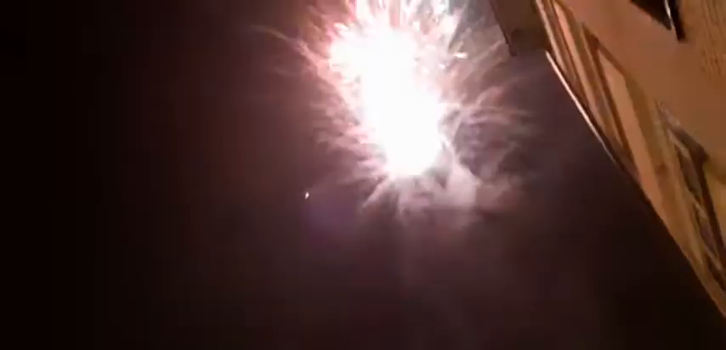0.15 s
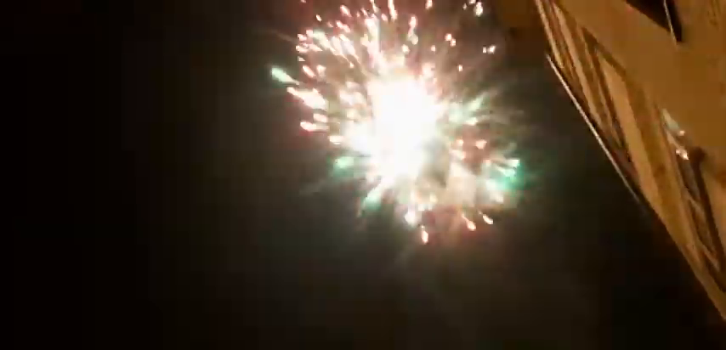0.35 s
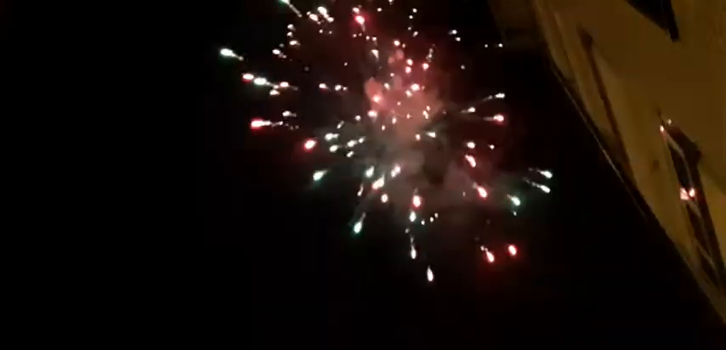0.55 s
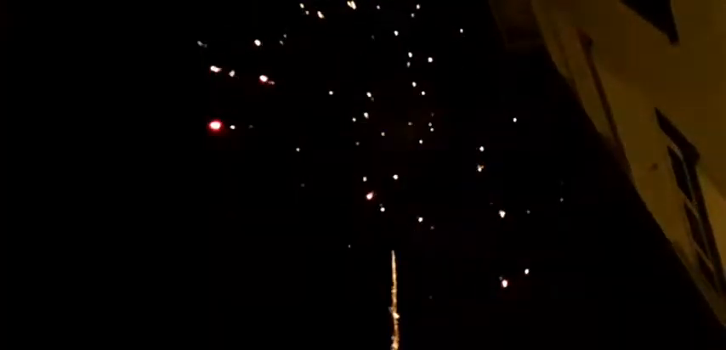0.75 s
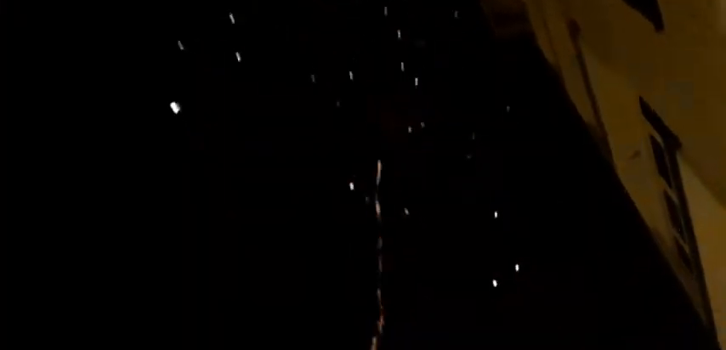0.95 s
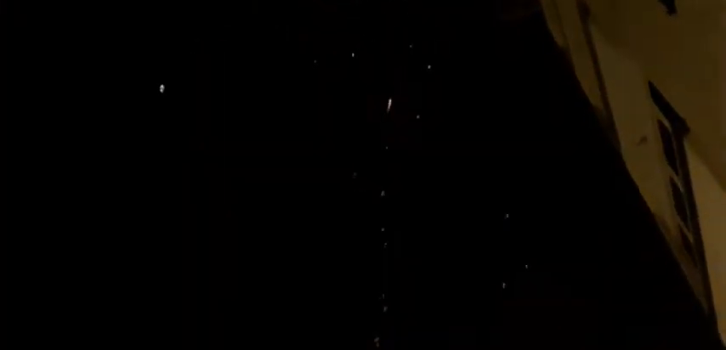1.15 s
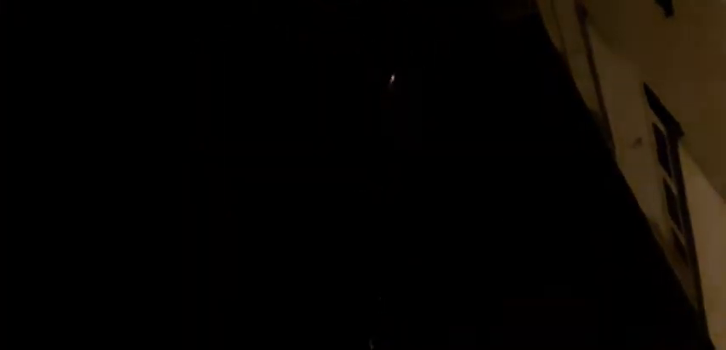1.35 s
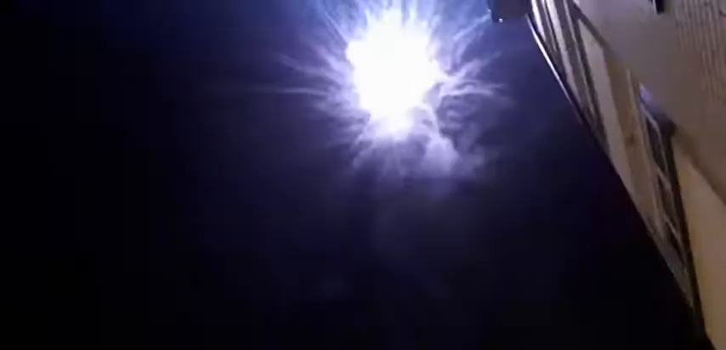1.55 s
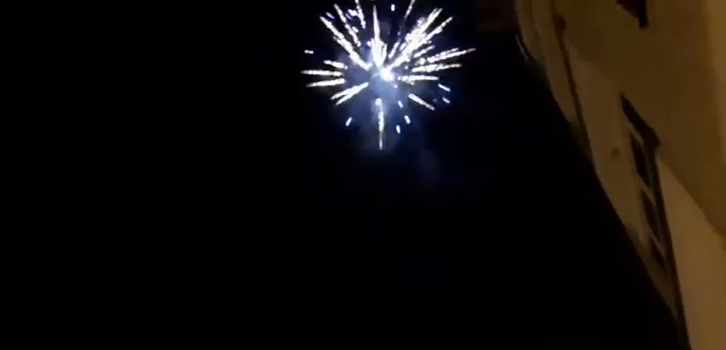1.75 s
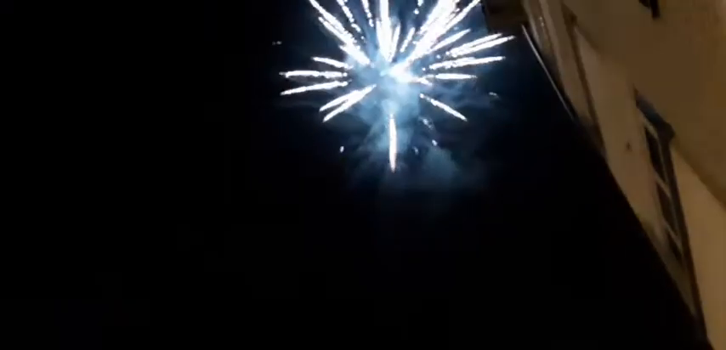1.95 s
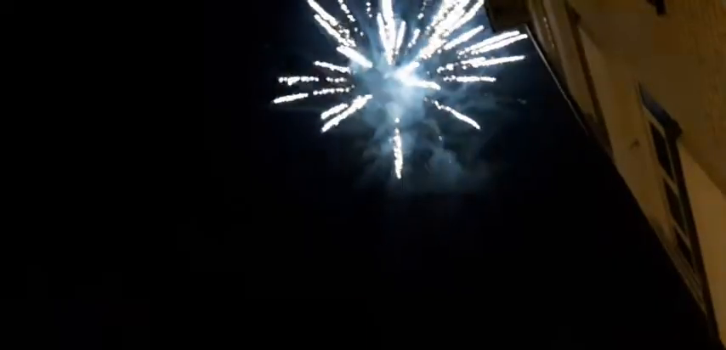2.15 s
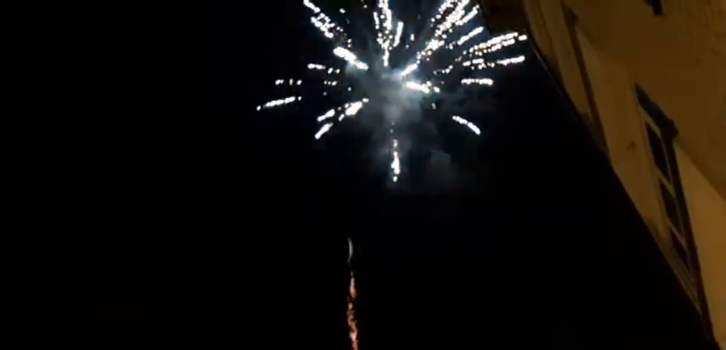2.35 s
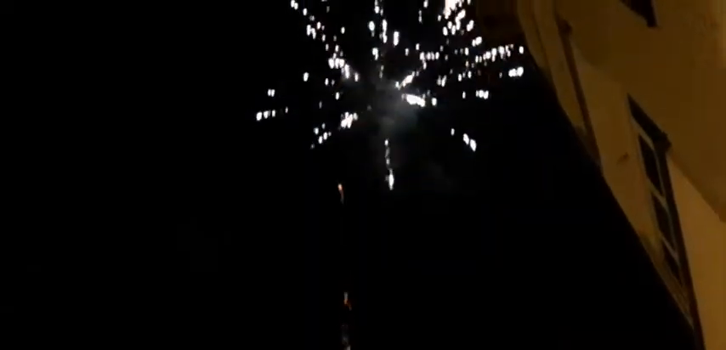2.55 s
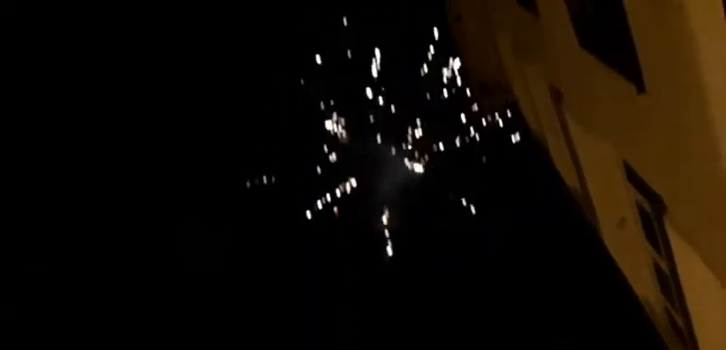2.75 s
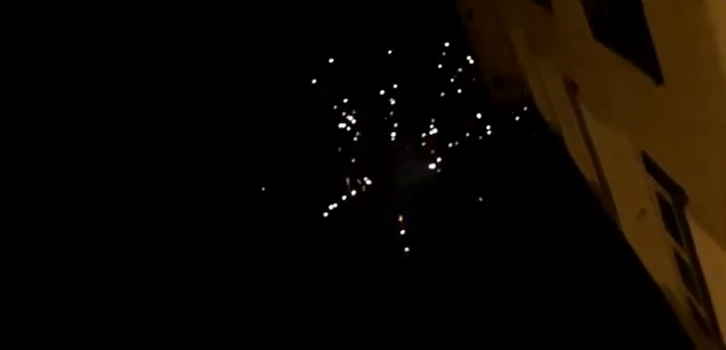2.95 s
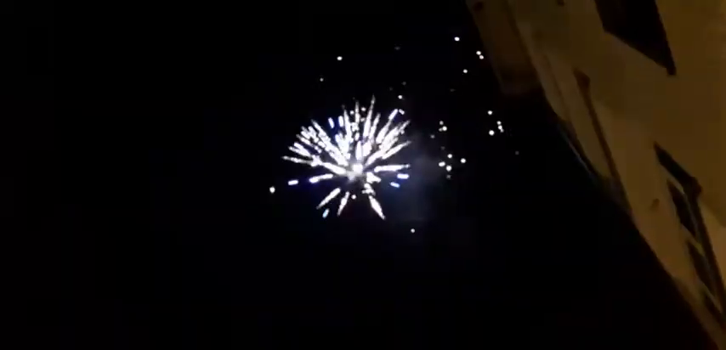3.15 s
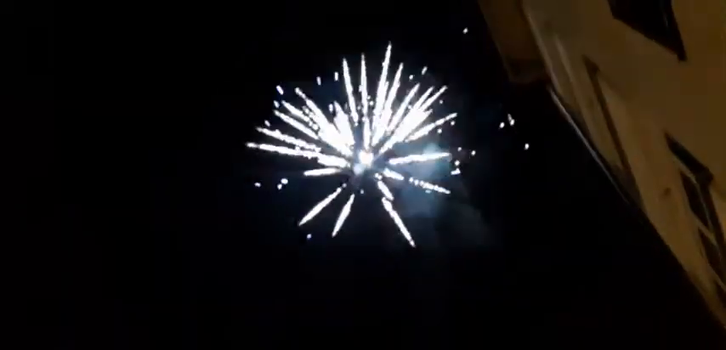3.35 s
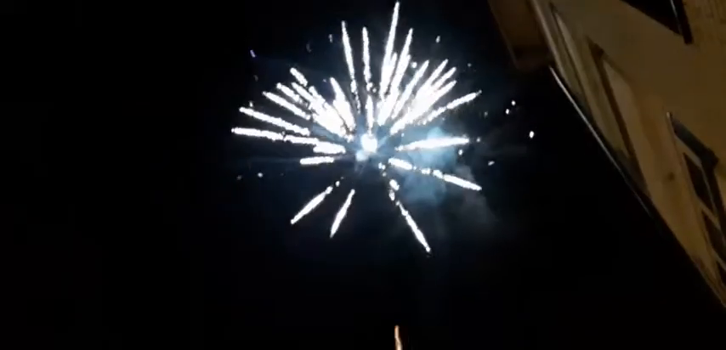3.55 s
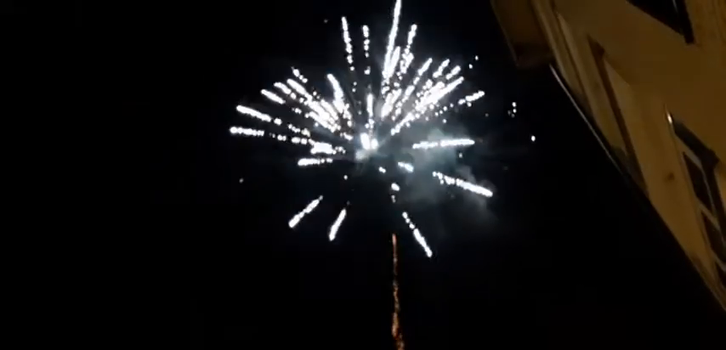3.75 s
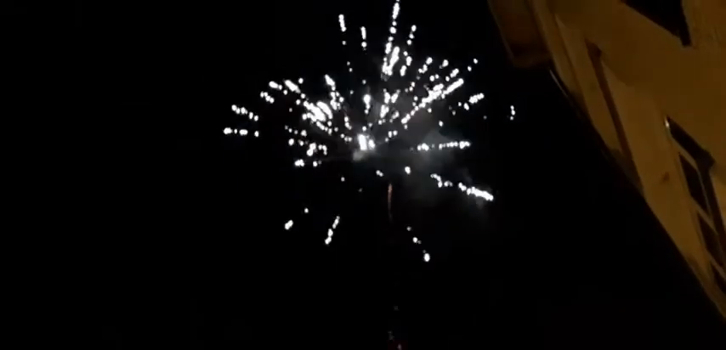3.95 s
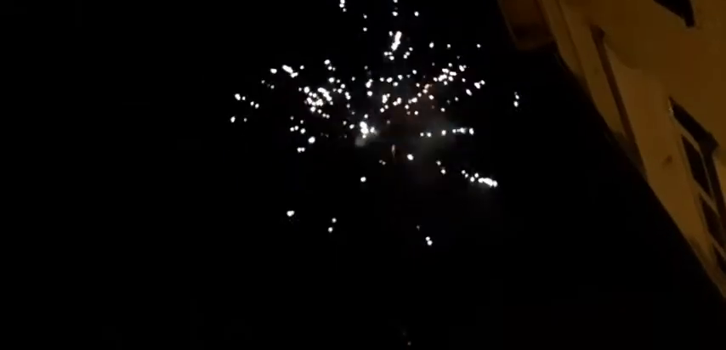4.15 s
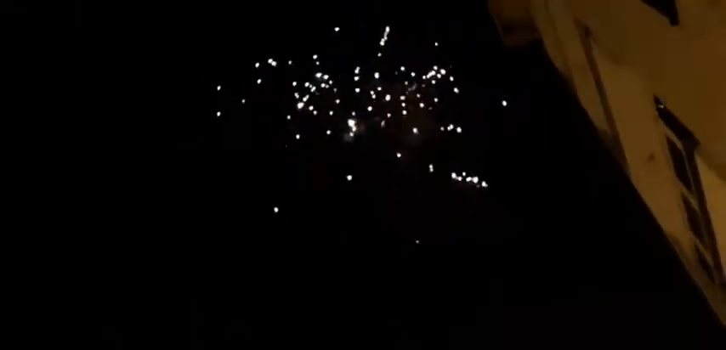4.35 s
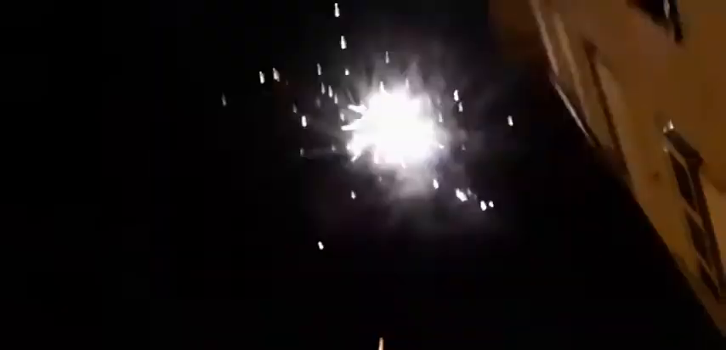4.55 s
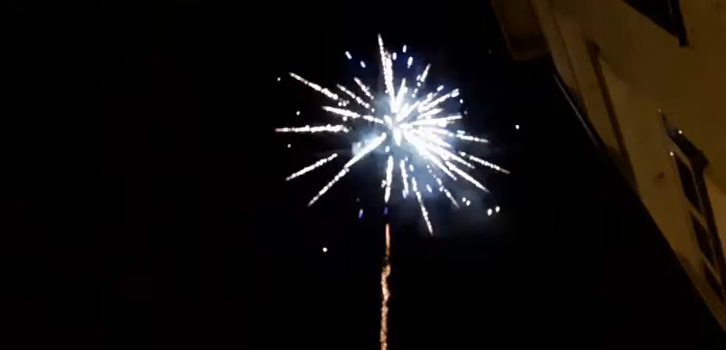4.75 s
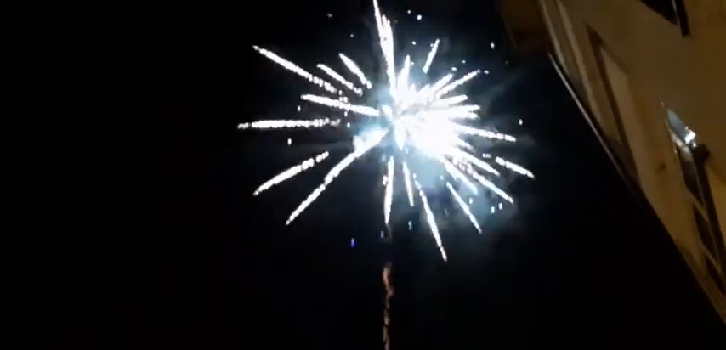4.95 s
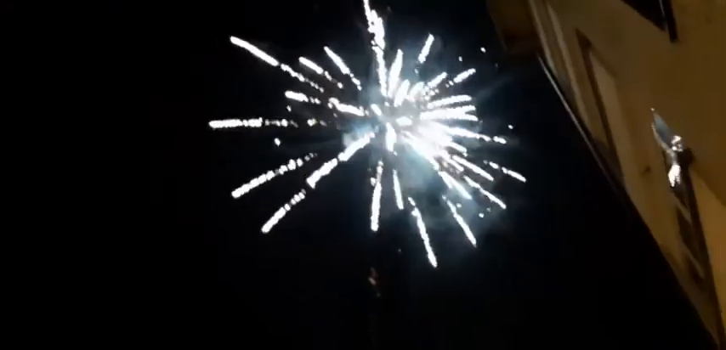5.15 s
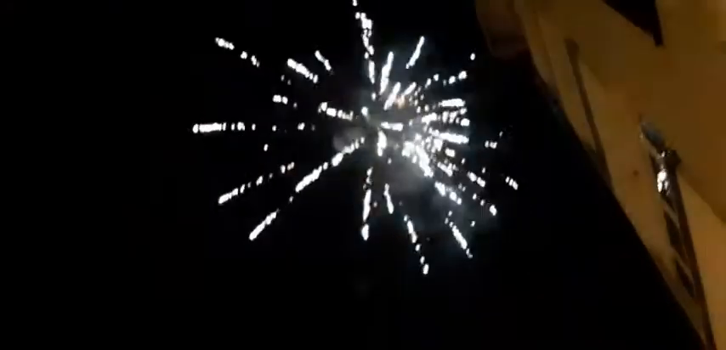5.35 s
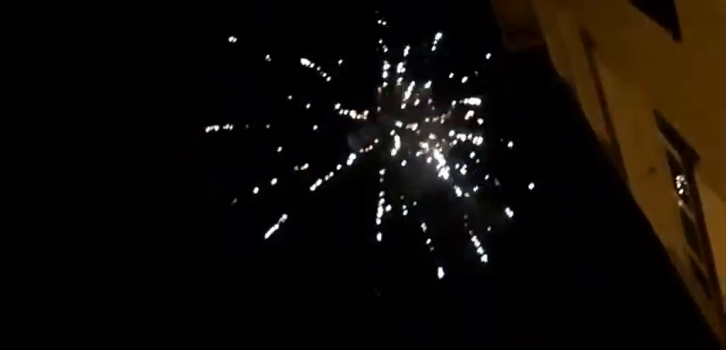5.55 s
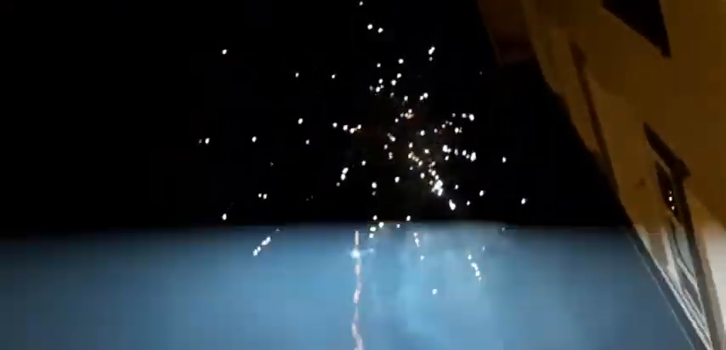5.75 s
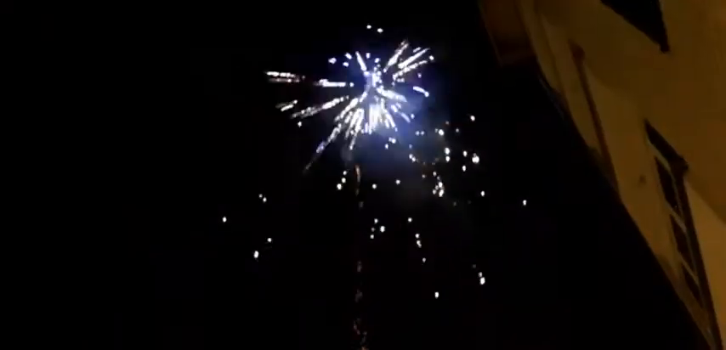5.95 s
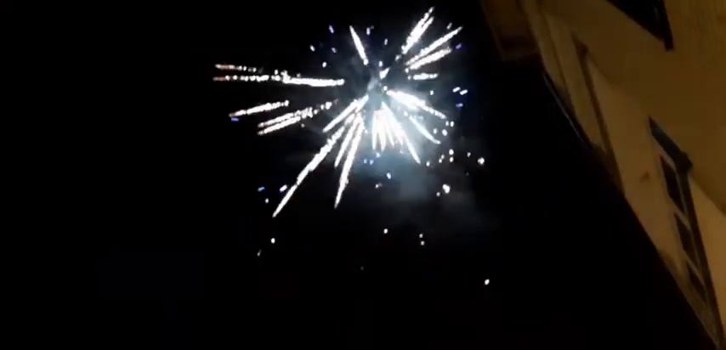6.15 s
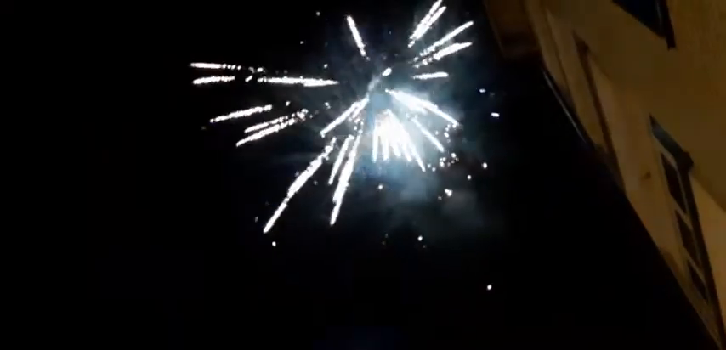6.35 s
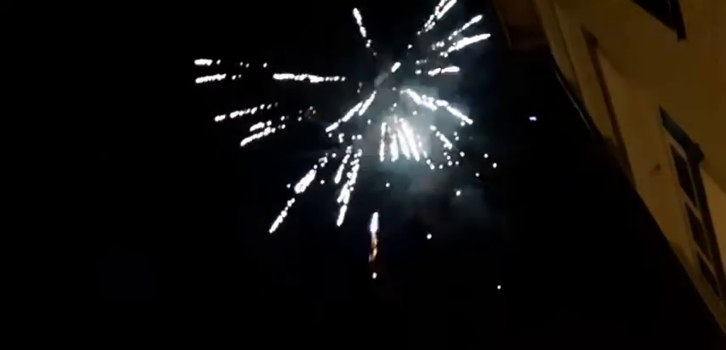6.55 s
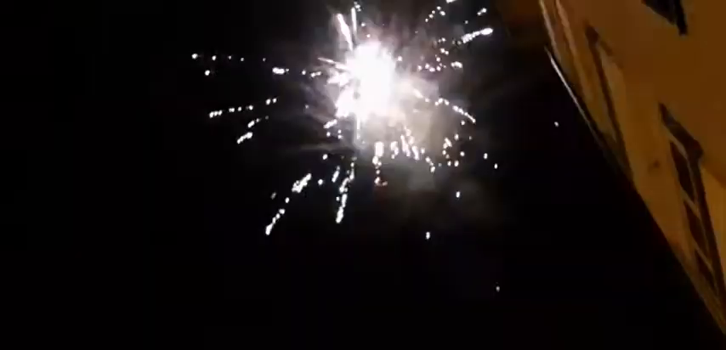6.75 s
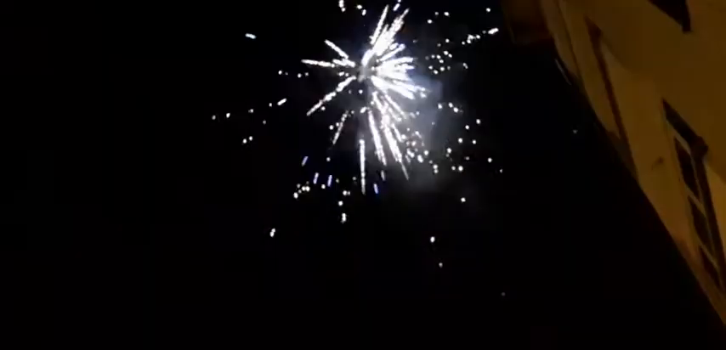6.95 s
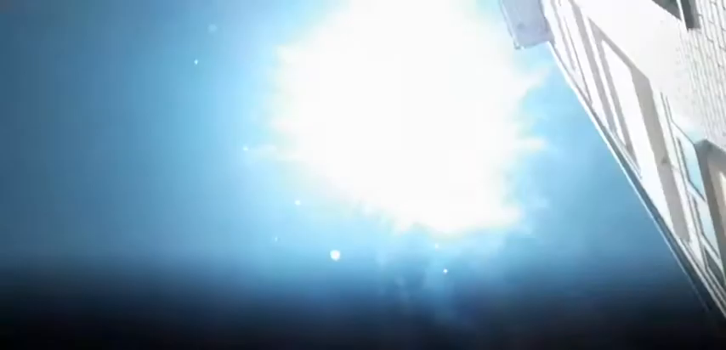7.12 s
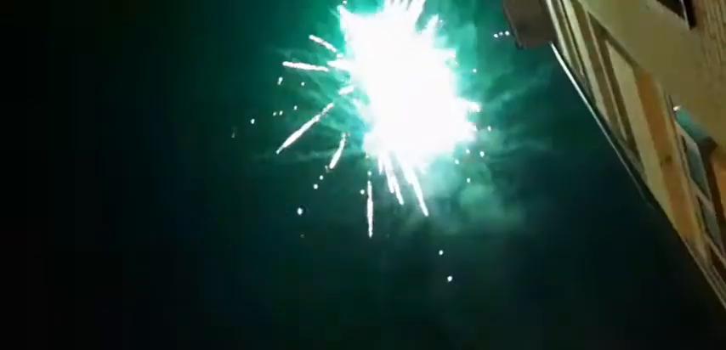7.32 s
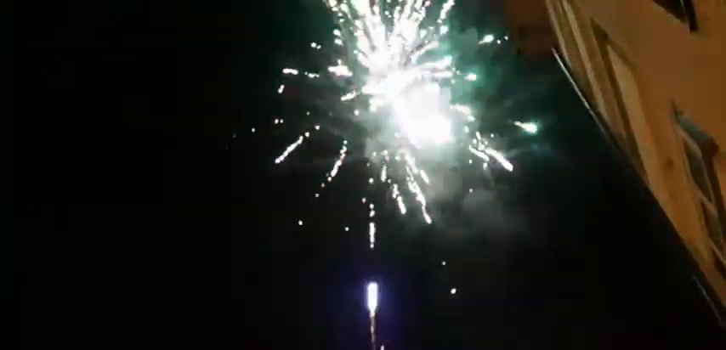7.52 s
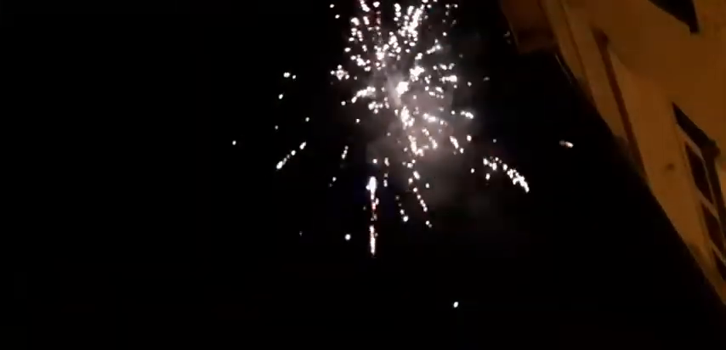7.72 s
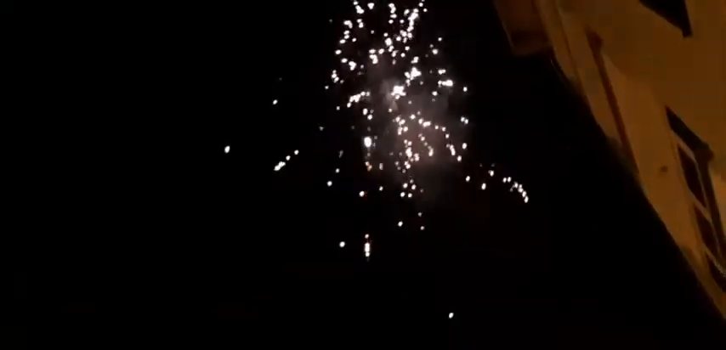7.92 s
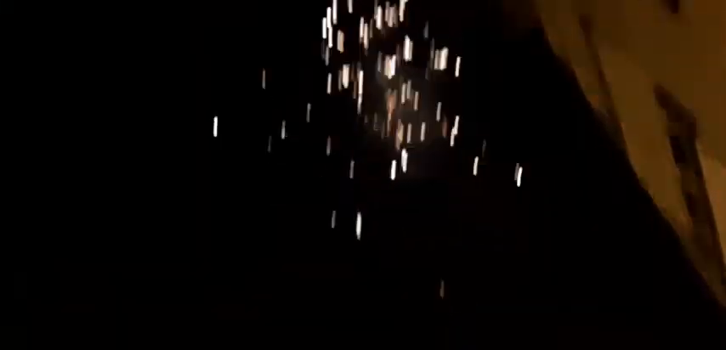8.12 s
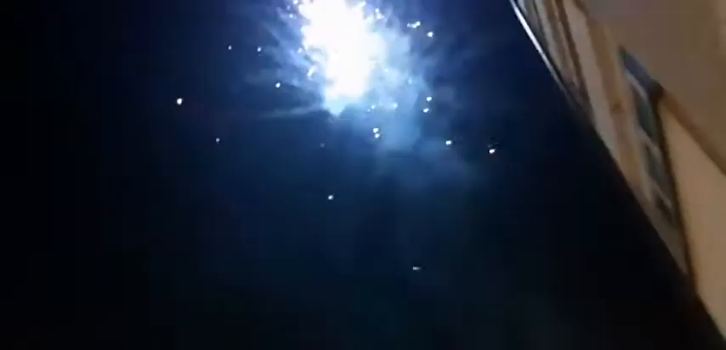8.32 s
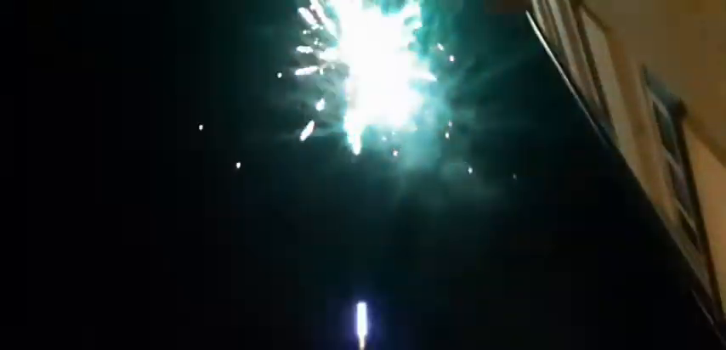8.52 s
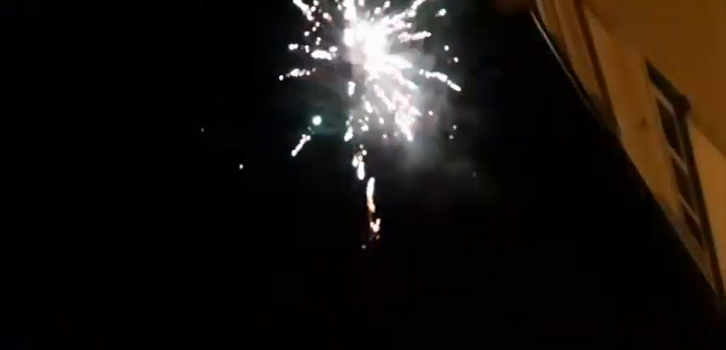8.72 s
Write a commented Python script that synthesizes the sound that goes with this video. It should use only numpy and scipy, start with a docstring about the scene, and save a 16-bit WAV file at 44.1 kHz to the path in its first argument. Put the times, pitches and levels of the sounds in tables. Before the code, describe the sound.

A firework battery fires close by in a narrow street at night. Punchy launch thumps from the ground and sharp, hollow bangs overhead come in an irregular series, often in pairs, with smaller pops and brief, light crackling between them. Each bang slaps off the house fronts and rolls away over the roofs. The stereo microphone stands near a wall and overloads slightly on the loudest hits.

```python
"""Fireworks in a narrow street

Night, a stereo pair close under a house front, a firework battery firing nearby. Mortars thump on the ground,
shells burst overhead, mortars farther off pop and stars crackle. Each pressure pulse slaps between the walls
and rolls away over the roofs; the loud ones overload the microphones. The town hums in the distance."""
import sys
import numpy as np
from scipy import signal
from scipy.fft import rfft, irfft, next_fast_len
from scipy.io import wavfile

SR = 44100
rng = np.random.default_rng(int(sys.argv[2]) if len(sys.argv) > 2 else 0)


def materialize(psi):
    """Save the field psi as 16-bit PCM at rate SR to the path in sys.argv[1].

    A 1-D psi becomes a single channel; in a 2-D psi each row is a channel.
    """
    bounded = np.clip(np.atleast_2d(psi).T, -1, 1)
    quanta = np.round(bounded * 32767).astype(np.int16)
    wavfile.write(sys.argv[1], SR, quanta)


N = 387198

# Mortars at street level. Each row: start in seconds, level in dB, house-front slap in dB.
MORTAR_SHOTS = [(0.3891, -4, -6), (1.939, -5.5, -3), (3.2689, -1.5, -7), (4.3423, -2, 3), (5.3852, -1.5, 3),
                (6.1891, -1.5, -1), (7.2360, -9, 2), (8.3233, -1, -9)]
# Colour of the mortar tube. Each row: frequency in Hz, gain in dB.
TUBE_COLOUR = [(60, 1), (250, 0), (450, -1), (800, 2), (1400, 1.5), (2100, -0.5), (3200, -2), (12000, 3)]
# Shells overhead. Each row: start in seconds, level in dB, hollow tone in Hz.
SHELL_BURSTS = [(.1424, -4, 690), (0.2473, -2, 644), (1.66, 1, 1107), (3.105, 2, 1230), (4.6199, -2, 630),
                (5.9174, -3, 715), (6.8257, -3, 720), (7.2392, -2, 784), (8.3390, -2.3, 860)]
# Mortars fired farther off, from other spots. Each row: start in seconds, level in dB, hollow tone in Hz, right
# microphone lag in ms.
DISTANT_MORTARS = [(.2350, -0.5, 803, 0), (.8280, -12, 1110, 0.27), (.9590, -11.5, 1200, 0.18),
                   (2.3640, -11.5, 1244, .2), (2.39, -7, 850, -0.2), (2.4223, -14, 890, 0),
                   (2.7157, -18, 1050, 0), (3.821, -8, 1190, 0.22), (4.3063, -6, 854, -.22),
                   (5.3249, -12.5, 1100, .2), (5.903, -10, 800, 0), (6.6090, -15.5, 900, -0.019),
                   (7.0959, -10.5, 994, 0), (7.9420, -13, 1100, .2)]
# Single crackling stars. Each row: start in seconds, level in dB.
STAR_SNAPS = [(.0331, -26.5), (.0659, -25), (.0937, -24), (1.08, -30), (3.4785, -23), (3.5687, -18),
              (3.6018, -28), (3.663, -28), (3.7648, -28.5), (3.9092, -27.5), (3.9767, -26.5)]
# Fine sparks as a shell burns out. Each row: start and end in seconds, opening level in dB.
SPARK_CLOUDS = [(3.374, 4.163, -23), (6.398, 6.696, -30.5)]
# Paths to the microphones, direct and off the walls, for each kind of source.
# Each row: delay in seconds, level in dB, right microphone lag in ms.
MORTAR_PATHS = [(0, 5, 0), (.0031, -4.5, 0.15), (.0078, -7.5, -.1), (.0300, -15, .2), (.0803, -6, 0),
                (.1178, -13.5, 0)]
HOUSE_FRONT_PATH = [(0.0235, 1, -.43)]
SHELL_PATHS = [(0, 0.5, 0), (.0087, -0.5, 0.1), (.0205, -14.5, -.3), (.0300, -5.5, .2), (.0930, -6.5, 0.1),
               (.0945, -16.5, -.2), (.1020, -13, -.2)]
POP_PATHS = [(0, -2, 0), (.0085, -10.5, -.1), (.0385, -15.5, .1)]
STAR_PATHS = [(0, -7, 0), (.0032, 3.5, .2), (.0062, -5.5, -.2)]
# Reverberation between the house fronts, and over the roofs.
# Each row: frequency in Hz, level in dB, seconds to fall by 60 dB.
STREET_REVERB = [(40, -29, .45), (102, -8.5, 0.15), (200, -2, 0.54), (500, -1.5, 0.47), (1000, -2, .5),
                 (2510, -2, 0.66), (6000, 0, 0.6), (15000, 1, 0.34)]
ROOF_REVERB = [(40, -20.5, 4.3), (101, -3.5, 2.43), (261, -1, 2.6), (650, 0.5, 1.83), (1300, -1, 2.42),
               (2430, 1.5, 2.02), (4640, 2, 1.53), (7700, -1, 1.26), (15000, 2, 0.47)]
# Rebounds off buildings farther down the street. Each row: delay in seconds, lift in dB.
FAR_REBOUNDS = [(.16, 9.5), (.215, 5.5), (0.309, 12), (0.389, 3.5), (.52, -0.5)]
# Hum of the distant town. Each row: frequency in Hz, relative level in dB.
TOWN_SPECTRUM = [(30, -24.5), (100, -10), (300, -3), (800, 0), (2500, -9), (6000, -29), (10000, -31),
                 (15000, -40)]
# Likeness of diffuse sound across the pair. Each row: frequency in Hz, left-right correlation.
PAIR_CORRELATION = [(40, 1), (150, 1), (300, 0.93), (500, 0.69), (1000, 0), (2000, 0), (15000, 0.039)]
# Response of the microphones. Each row: frequency in Hz, gain in dB.
MIC_RESPONSE = [(30, -9), (120, 2), (200, 3), (420, 0.5), (730, 2), (1000, 0), (1400, -1), (1900, -1.5),
                (3000, 0), (5000, -3.5), (7500, -5.5), (9300, -13.5), (12000, -7.5), (15500, -7.5)]


def shells(level_db, roll_db, tear_db, tear_ms):
    """Each shell bursts elsewhere overhead: a pulse with its own tone and scatter; the overloaded microphones
    crack shrilly behind it."""
    near, far = np.zeros((2, N)), np.zeros((1, N))
    for start, db, tone_hz in SHELL_BURSTS:
        gain = from_db(level_db + db)
        pulse = gain * blast(ms=0.25 * np.exp(0.0039 * db))[None]
        walls = slaps(SHELL_PATHS, rasp_db=-25.5, rasp_s=0.0011)
        paths = street(walls, scatter_db=-31.5, build_s=0.0053, hold_s=0.061, grain_db=5.5)
        bang = resonate(through(pulse, paths), tone_hz, db=4, q=5.2)
        boom_db = 3.5 - 4 * np.log2(tone_hz / 765)   # deeper-toned shells boom more
        add(near, start, resonate(bang, hz=121, db=boom_db, q=1.4))
        tear = through(blast(tear_ms), slaps(SHELL_PATHS[:2], rasp_db=1.5, rasp_s=0.001))
        add(near, start, gain * from_db(tear_db) * tear)
        add(far, start, from_db(roll_db) * pulse)
    return near, far


def mortars(level_db, roll_db, bark_hz, bark_db):
    """The tubes stand in one spot, so all shots take the same paths; the house front slaps back."""
    near, far = np.zeros((2, N)), np.zeros((1, N))
    walls = resonate(slaps(MORTAR_PATHS, rasp_db=-24, rasp_s=0.0011), bark_hz, bark_db, q=4.5)
    walls = resonate(walls, hz=125, db=3.5, q=2.3)   # the thump of the tube
    front = resonate(slaps(HOUSE_FRONT_PATH, rasp_db=-19, rasp_s=0.0004), hz=1700, db=11, q=3)
    no_walls = np.zeros((2, 1))
    wash = street(no_walls, scatter_db=-33.5, build_s=0.006, hold_s=0.016, grain_db=5)
    # the house front sends a second, shorter wave of scatter down the street
    second_wave = street(no_walls, scatter_db=-26, build_s=0.0009, hold_s=0, grain_db=10.5)
    second_wave = band(second_wave * from_db(-90 * seconds(0.65)), low_hz=500, high_hz=12000)
    add(wash, HOUSE_FRONT_PATH[0][0], resonate(second_wave, hz=1600, db=0.5, q=2.7))
    shot = colour(blast(ms=0.23)[None], TUBE_COLOUR)   # every tube holds the same lifting charge
    for start, db, slap_db in MORTAR_SHOTS:
        pulse = from_db(level_db + db) * shot
        add(near, start, through(pulse, walls + from_db(slap_db) * front))
        add(near, start, through(pulse, wash))
        add(far, start, from_db(roll_db) * pulse)
    return near, far


def pops(level_db, roll_db, air_hz, tone_db):
    """Mortars fired farther off: short, hollow pops with a soft front; the higher the tone, the thinner the
    bass."""
    near, far = np.zeros((2, N)), np.zeros((1, N))
    for start, db, tone_hz, lag_ms in DISTANT_MORTARS:
        walls = slaps(np.add(POP_PATHS, [0, 0, lag_ms]), rasp_db=-19, rasp_s=0.0014)
        paths = street(walls, scatter_db=-34.5, build_s=0.0027, hold_s=0.0046, grain_db=9.5)
        puff = band(blast(ms=0.29), low_hz=330 * (tone_hz / 1000) ** 2, high_hz=air_hz)
        pulse = from_db(level_db + db) * resonate(puff, tone_hz, tone_db, q=2.5)[None]
        add(near, start, through(pulse, paths))
        add(far, start, from_db(roll_db) * pulse)
    return near, far


def crackle(level_db, roll_db, pulse_ms, wash_db):
    """Stars snap one by one among clouds of finer sparks, each from its own point in the sky."""
    sparks_per_s, fade_db_per_s, spread_db = 30, 21.5, 18
    snaps = list(STAR_SNAPS)
    for start, end, db in SPARK_CLOUDS:
        count = round(sparks_per_s * (end - start))
        for age, size in rng.random((60, 2))[:count] * [end - start, 1]:
            snaps.append((start + age, db - fade_db_per_s * age + spread_db * (size - 0.5)))
    snap = from_db(level_db) * band(blast(pulse_ms), low_hz=1200, high_hz=8300)[None]
    near, pulses = np.zeros((2, N)), np.zeros((1, N))
    for start, db in snaps:
        detour = rng.uniform(0.9, 1.5)   # the way round by the wall differs from star to star
        echoes = [(delay * detour, echo_db, lag_ms) for delay, echo_db, lag_ms in STAR_PATHS]
        add(near, start, from_db(db) * through(snap, slaps(echoes, rasp_db=-15.5, rasp_s=0.0012)))
        add(pulses, start, from_db(db) * snap)
    wash = from_db(wash_db) * scatter(STREET_REVERB, seconds(0.65), grain_db=4)
    return near + through(pulses, wash)[:, :N], from_db(roll_db) * pulses


def blast(ms):
    """A shock front of height 1, falling after `ms` into a longer suction phase."""
    age = seconds(0.012) * 1000 / ms
    return (1 - age) * np.exp(-age)


def slaps(echoes, rasp_db, rasp_s, dull_db_per_s=110):
    """Echoes off flat walls, each trailed by a rasp off sills and gutters; late ones lose their edge."""
    out, t = np.zeros((2, SR // 4)), seconds(0.015)
    for delay, db, lag_ms in echoes:
        arrival = from_db(rasp_db) * diffuse(len(t)) * t / rasp_s * np.exp(1 - t / rasp_s)
        lag = round(lag_ms * SR / 1000)
        arrival[0, max(-lag, 0)] += 1
        arrival[1, max(lag, 0)] += 1
        dull = lowpass(arrival, hz=3000)
        edge = from_db(-dull_db_per_s * delay) * (arrival - dull)
        add(out, delay, from_db(db) * (dull + edge))
    return out


def street(walls, scatter_db, build_s, hold_s, grain_db):
    """Wall echoes, then scatter that builds, holds while the sound sinks between the houses, and dies."""
    t = seconds(0.65)
    build_up = from_db(scatter_db) * (1 - np.exp(-t / build_s))
    out = build_up * scatter(STREET_REVERB, np.maximum(t - hold_s, 0), grain_db)
    add(out, 0, walls)
    return out


def roofs(pulses, build_s, far_s, far_db, far_width_s):
    """The long roll over town, with rebounds off single buildings and a swell off a far row of houses."""
    t = seconds(2.4)
    far_row = from_db(far_db * np.exp(-((t - far_s) / far_width_s) ** 2))
    swell = (1 - np.exp(-(t / build_s) ** 2)) * far_row
    for delay, db in FAR_REBOUNDS:
        swell *= from_db(db * (t > delay) * np.exp(-np.abs(t - delay) / 0.0015))
    roll = swell * scatter(ROOF_REVERB, t, grain_db=3.5, patchy_db=3, lumps_per_s=55)
    return through(pulses, roll)[:, :N]


def town(hum_db, earlier_db, earlier_s):
    """Distant town noise, and the dying roll of a shot fired before."""
    hum = colour(diffuse(N), TOWN_SPECTRUM)
    roll = through(blast(ms=0.25), scatter(ROOF_REVERB, seconds(2.4) + earlier_s, grain_db=0))
    out = from_db(hum_db) * hum / hum.std()
    add(out, 0, from_db(earlier_db) * roll)
    return out


def scatter(place, age, grain_db, patchy_db=2.5, lumps_per_s=70, bands=16):
    """Countless reflections arriving in clumps; each band dies at its own rate with age."""
    size = next_fast_len(len(age))
    hz = np.fft.rfftfreq(size, 1 / SR)
    field = rfft(diffuse(size, grain_db)) * from_db(at_hz(place, hz))
    centres = np.geomspace(60, 15000, bands)
    out, common_lumps = 0, lumps(len(age), lumps_per_s)
    for centre, weights in zip(centres, np.eye(bands)):
        part = irfft(field * at_hz(np.c_[centres, weights], hz), size)[:, :len(age)]
        clumping = from_db(patchy_db * (lumps(len(age), lumps_per_s) + 0.5 * common_lumps))
        decay = from_db(-60 * age / at_hz(place, centre, column=2))
        out = out + part * clumping * decay
    return out


def diffuse(size, grain_db=0):
    """Noise from all sides, in grains of uneven strength: alike at both microphones in the bass only."""
    strength = from_db(grain_db * np.clip(rng.standard_normal(size), -2.5, 2.5))
    mid, side = rfft(rng.standard_normal((2, size)) * strength / np.sqrt(np.mean(strength ** 2)))
    alike = at_hz(PAIR_CORRELATION, np.fft.rfftfreq(size, 1 / SR))
    return irfft(np.sqrt(1 + alike) * mid + np.sqrt(1 - alike) * side * [[1], [-1]], size)


def lumps(size, per_s):
    """A random curve of spread about 1."""
    knots = rng.standard_normal(600)
    return np.interp(np.arange(size) / SR * per_s, np.arange(len(knots)), knots)


def resonate(x, hz, db, q):
    """A broad resonance that lifts the sound around one pitch."""
    return x + (from_db(db) - 1) * signal.lfilter(*signal.iirpeak(hz, q, fs=SR), x)


def band(x, low_hz, high_hz):
    """Gently thinned below, dulled by the air above."""
    thin = signal.sosfilt(signal.butter(1, low_hz, "high", fs=SR, output="sos"), x)
    return lowpass(thin, high_hz, order=3)


def lowpass(x, hz, order=1):
    """Roll off the treble."""
    return signal.sosfilt(signal.butter(order, hz, fs=SR, output="sos"), x)


def colour(x, spectrum, size=4096):
    """A causal (minimum-phase) filter that follows a spectrum table."""
    gain = from_db(at_hz(spectrum, np.fft.rfftfreq(size, 1 / SR)))
    cepstrum = irfft(np.log(gain))
    cepstrum[1:size // 2] *= 2
    cepstrum[size // 2 + 1:] = 0
    return through(x, irfft(np.exp(rfft(cepstrum))))[:, :x.shape[1]]


def through(x, response):
    """Convolve, channel by channel."""
    return signal.fftconvolve(np.atleast_2d(x), np.atleast_2d(response), axes=1)


def add(out, start_s, sound):
    """Mix a sound in at a given time."""
    start = round(start_s * SR)
    part = sound[:, :max(out.shape[1] - start, 0)]
    out[:, start:start + part.shape[1]] += part


def at_hz(table, hz, column=1):
    """Read a column of a spectrum table on a log-frequency axis."""
    table = np.array(table)
    return np.interp(np.log(np.maximum(hz, 1)), np.log(table[:, 0]), table[:, column])


def from_db(db):
    """Decibels to gain."""
    return 10 ** (np.asarray(db) / 20)


def seconds(length):
    """A time axis."""
    return np.arange(int(length * SR)) / SR


def scene():
    """The charges close by in the street, their common roll over the roofs, and the town behind."""
    sources = [shells(level_db=11, roll_db=-42.5, tear_db=-16.5, tear_ms=0.053),
               mortars(level_db=7.5, roll_db=-45.5, bark_hz=1240, bark_db=2),
               pops(level_db=0, roll_db=-47.5, air_hz=5300, tone_db=6.5),
               crackle(level_db=7, roll_db=-46.5, pulse_ms=0.089, wash_db=-28)]
    near, far = [sum(part) for part in zip(*sources)]
    roll = roofs(far, build_s=0.073, far_s=0.35, far_db=1.5, far_width_s=0.099)
    return near + roll + town(hum_db=-51, earlier_db=-43.5, earlier_s=0.32)


def record(dry):
    """The microphones overload on the shock fronts and colour the sound; the top is cut."""
    ceiling, cutoff_hz = from_db(-3.5), 16000
    left, right = colour(ceiling * np.tanh(dry / ceiling), MIC_RESPONSE)
    right = right - 2 * lowpass(right, hz=34)   # the pair drifts out of phase in the deepest bass
    return signal.sosfilt(signal.ellip(10, 0.3, 80, cutoff_hz, fs=SR, output="sos"), [left, right])


dry = scene()
out = record(dry)
materialize(out)
```